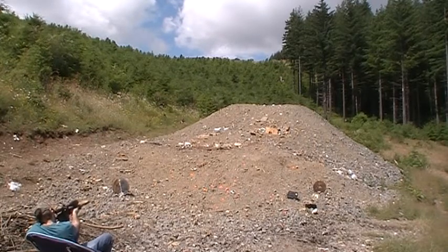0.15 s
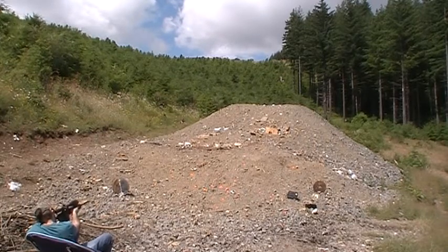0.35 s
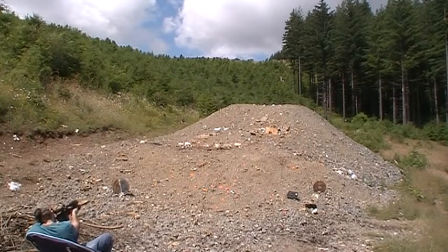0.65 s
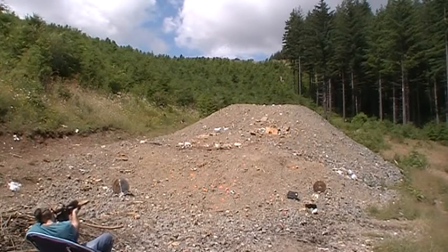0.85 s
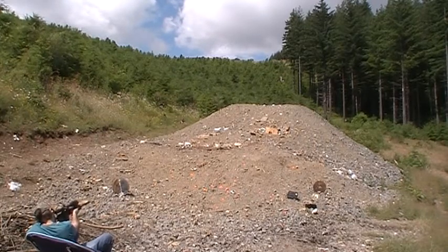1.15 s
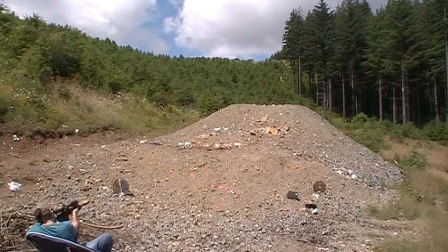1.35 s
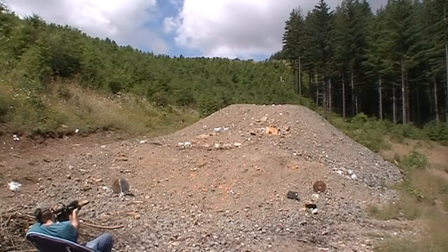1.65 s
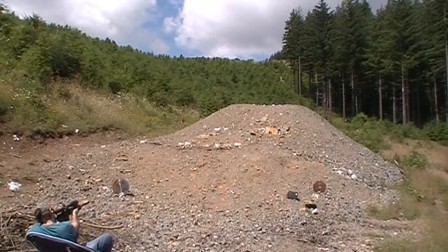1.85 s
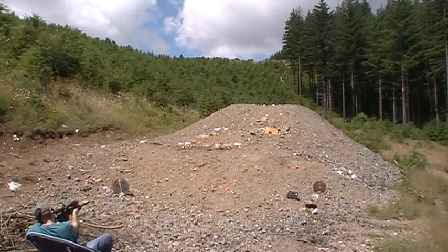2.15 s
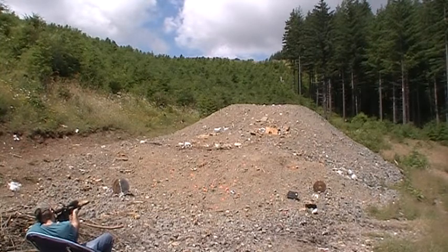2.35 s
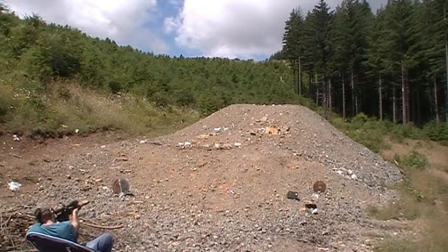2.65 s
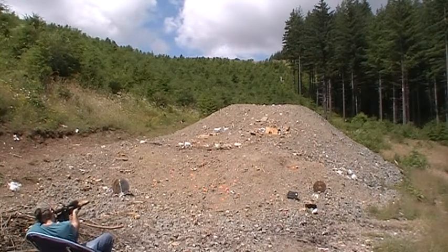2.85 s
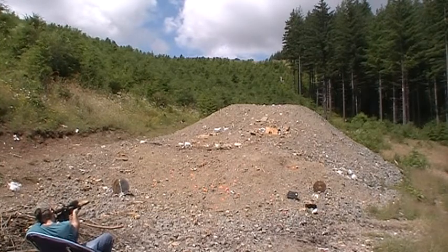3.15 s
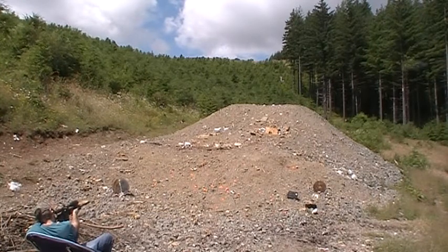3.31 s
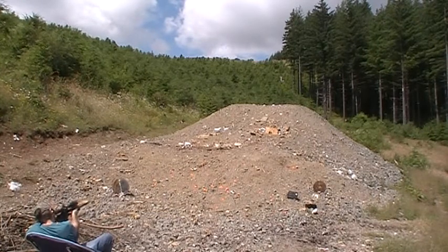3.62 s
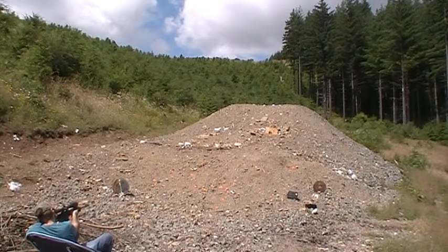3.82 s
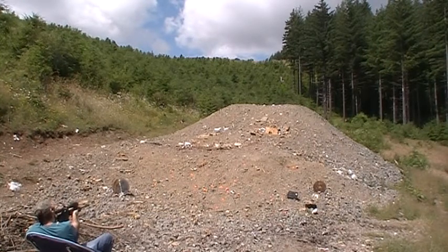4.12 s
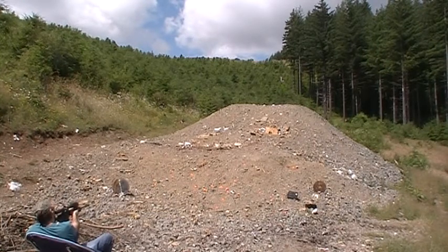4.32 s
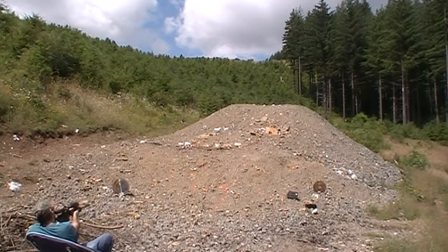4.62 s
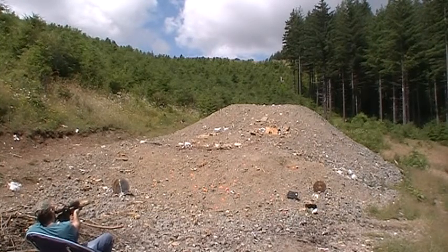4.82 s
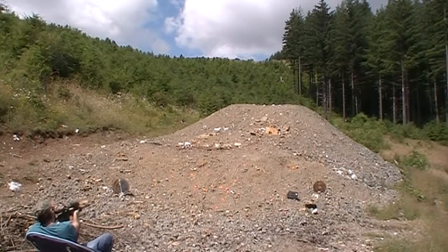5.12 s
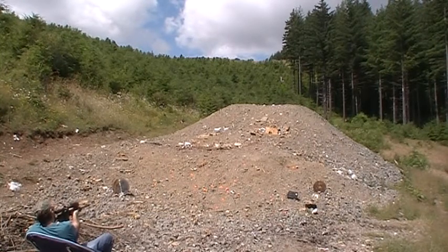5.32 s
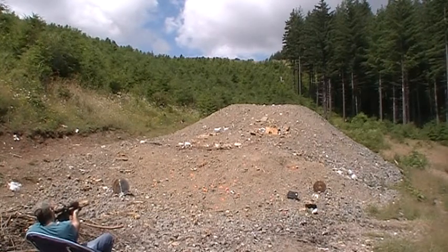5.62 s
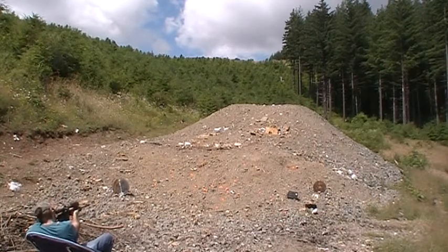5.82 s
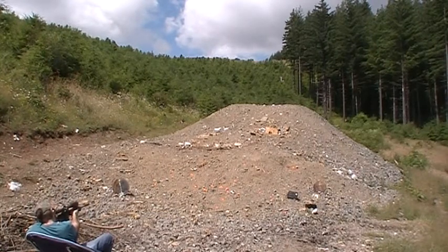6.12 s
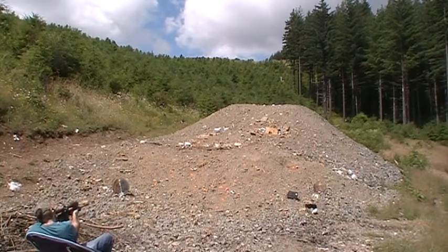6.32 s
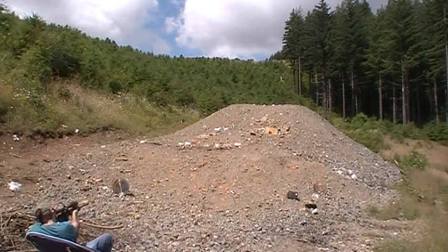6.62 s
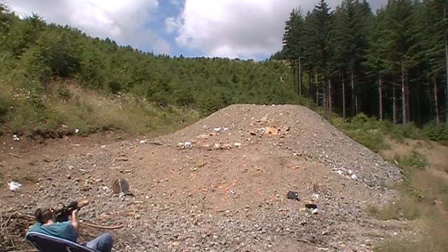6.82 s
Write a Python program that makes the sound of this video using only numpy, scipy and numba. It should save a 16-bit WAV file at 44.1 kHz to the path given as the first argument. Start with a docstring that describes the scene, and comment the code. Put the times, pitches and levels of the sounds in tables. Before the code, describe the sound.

At an open-air range among hills, a microphone behind the shooter picks up the sharp clack of a rifle being closed, then rising wind rumble. Two sharp shots overload it slightly and echo across the slopes, the second throwing up stones, with clicks and the faint tinkle of a spent case. A third shot comes about two seconds later, with a high ring from a steel target.

```python
"""A faint valley murmur, wind on the microphone, ticks of gear and a rifle action clacking shut.
The place is an outdoor gravel range, the microphone a small stereo pair behind the shooter. Three shots
overload it, slap back off near banks and roll back from wooded hills. The second throws up gravel and a
brass case bounces; the third rings a steel plate downrange. Gain control ducks after the peaks."""
import sys
import numpy as np
from scipy import signal
from scipy.fft import rfft, irfft, next_fast_len
from scipy.io import wavfile
from scipy.ndimage import uniform_filter1d, minimum_filter1d
from numba import njit

SR = 44100
rng = np.random.default_rng(int(sys.argv[2]) if len(sys.argv) > 2 else 0)


def to_wav(sig):
    """Store sig (one row per channel, or 1-D mono) as 16-bit WAV at the path in sys.argv[1].

    Samples outside -1..1 are clipped; the rate is SR.
    """
    pcm = np.clip(np.atleast_2d(sig), -1, 1) * 32767
    pcm = np.round(pcm).astype(np.int16)
    wavfile.write(sys.argv[1], SR, pcm.T)  # frames by channels


N = 306933
TIME = np.arange(N) / SR


def undb(db):
    """Decibels to amplitude."""
    return 10 ** (np.asarray(db) / 20)


def unit(x):
    """Scale to rms 1."""
    return x / np.sqrt(np.mean(x ** 2))


def power_sum(levels_db):
    """Gain of unrelated sounds heard together."""
    return np.sqrt(sum(undb(db) ** 2 for db in levels_db))


def colour(x, spectrum, edges_hz):
    """Shape x by a spectrum and split it at the edges into bands of rms 1."""
    size = next_fast_len(N)
    hz = np.arange(size // 2 + 1) * SR / size + 1
    points_hz, points_db = np.transpose(spectrum)
    shaped = rfft(x, size) * undb(np.interp(np.log(hz), np.log(points_hz), points_db))
    below = [0] + [1 / (1 + (hz / edge) ** 4) for edge in edges_hz] + [1]
    return [unit(irfft(shaped * (b - a), size)[..., :N]) for a, b in zip(below, below[1:])]


def wide(mid, side, side_db):
    """Left and right from mid and side."""
    return np.array([mid + undb(side_db) * side, mid - undb(side_db) * side])


def drift(rate_hz):
    """Smooth random wander of rms 1."""
    hold = int(SR / rate_hz)
    steps = np.repeat(rng.standard_normal(N // hold + 1), hold)
    return unit(uniform_filter1d(uniform_filter1d(steps, hold), hold)[:N])


def add(out, x, s):
    """Mix x into out from time s."""
    i = int(s * SR)
    out[..., i:i + x.shape[-1]] += x[..., :N - i]


# Open air over the valley. Each row: frequency in Hz, relative level in dB.
AIR_SPECTRUM = [(88, -33), (150, -15.5), (263, -8.5), (301, -8), (379, -4), (732, -4.5), (1020, -10),
                (1390, -10.5), (2620, -21.5), (4090, -30), (7900, -39), (15200, -52.5)]
# Far swells, perhaps echoes of distant shots. Each row: start in seconds, level in dB, t60 in seconds.
FAR_SWELLS = [(.108, -51, 1.6), (1.672, -51, 0.7), (2.666, -50, 1)]


def valley():
    """A soft distant wash; far swells start sharply in the presence band, the lows following."""
    low, presence, hiss = colour(rng.standard_normal((2, N)), AIR_SPECTRUM, [1000, 3000])
    low_db, presence_db = [-53], [-63]  # the murmur under the swells
    low_lag_s = .09
    for s, db, t60 in FAR_SWELLS:
        late = TIME - s
        fade_db = db - 60 * late / t60
        presence_db.append(fade_db + 3000 * np.minimum(late, 0))
        low_db.append(fade_db - 1.5 + 150 * np.minimum(late - low_lag_s, 0))
    wash = undb(drift(7.9)) * (power_sum(low_db) * low + power_sum(presence_db) * presence)
    return wide(*(wash + undb(-67.5 + drift(4)) * hiss), side_db=-4)


# Wind right on the microphone ports. Each row: frequency in Hz, relative level in dB.
WIND_SPECTRUM = [(12, -61.5), (20, -8), (58, -2), (106, 0), (156, -4.5), (183, -6.5), (346, -14.5),
                 (426, -44.5), (484, -13.5), (900, -43.5), (1170, -44.5), (1980, -120)]
# Gusts at the microphone. Each row: start in seconds, time at full strength in seconds, level in dB.
WIND_GUSTS = [(.05, .25, -58), (.66, 0.083, -49), (.92, .16, -35), (1.21, 0.045, -37), (1.4, .22, -36),
              (2.1, .12, -30.5), (2.3, 0.07, -41.5), (2.6, 0.082, -45.5), (2.78, 0.19, -29),
              (3.14, .17, -20), (3.465, .15, -14), (3.83, .2, -17.5), (4.1, 0.077, -24), (4.29, 0.033, -24),
              (4.57, .14, -23), (4.83, 0.098, -26), (5.0, 0.12, -38.5), (5.2, .05, -36),
              (5.399, 0.086, -44.5), (5.65, .13, -40.5), (6.0, 0.1, -46), (6.23, 0.19, -49),
              (6.59, 0.06, -40.5), (6.72, 0.066, -40.5), (6.901, 0.053, -47)]


def wind(rise_db_s=215.5, fall_db_s=203.5, calm_db=-60.5, lean_left=.14):
    """Buffeting pushes the two ports in opposite sense, so it lies mostly in the side signal."""
    rumble, flutter = colour(rng.standard_normal((2, N)), WIND_SPECTRUM, [200])
    gusts = [db - rise_db_s * np.maximum(s - TIME, 0) - fall_db_s * np.maximum(TIME - s - length, 0)
             for s, length, db in WIND_GUSTS]
    gust_db = np.maximum(np.max(gusts, axis=0), calm_db)
    buffet_db = 2.2 * drift(18)
    flutter_db = -16.5 + .67 * (gust_db + 31) + 5.4 * drift(30)  # strong gusts flutter higher
    mid, side = undb(gust_db + buffet_db) * (rumble + undb(flutter_db) * flutter)
    return wide(undb(-12) * mid + lean_left * side, side, side_db=0)


# Gear and gravel around the shooter. Each row: start in seconds, relative level in dB, centre in Hz.
GEAR_TICKS = [(.032, -50, 2800), (.047, -48, 2800), (.063, -45.5, 2800), (0.2389, -48, 3250),
              (0.514, -39.5, 3250), (0.889, -57, 4500), (1.0224, -48.5, 4170), (1.3967, -47, 3030),
              (1.5846, -29, 2600), (1.632, -49, 3230), (3.49, -22, 3450), (4.0367, 3, 2800),
              (4.0843, 0, 2800), (4.187, -1.5, 2810), (4.2271, -5.5, 3200), (4.2986, -3.5, 2580),
              (4.733, -26, 3180), (5.0301, -50, 3280), (6.6295, -46.5, 4540)]


def ticks(t60=.013):
    """Gear and falling stones each give a sharp click and a brief rattle in a broad band."""
    out = np.zeros((2, N))
    t = np.arange(900) / SR
    for s, db, hz in [*GEAR_TICKS, *falling_stones()]:
        rattle = rng.standard_normal((2, len(t)))
        rattle[0, 0] = 5  # the click
        burst = wide(*rattle, side_db=-4.5) * undb(db + 6 - 60 * t / t60)
        band = signal.butter(3, [hz / 1.8, 1.7 * hz], "band", fs=SR, output="sos")
        add(out, signal.sosfilt(band, burst), s)
    return out


# The action closing, just ahead of the microphone. Each row: start in seconds, relative level in dB.
ACTION_BLOWS = [(0.2975, -9.5), (0.2991, -2.5), (0.302, 3), (.308, -8), (.311, 7.5), (0.314, 4.5),
                (0.324, -12.5)]
# Resonances of the receiver. Each row: centre in Hz, width in Hz, relative level in dB.
RECEIVER_MODES = [(2050, 1400, 6.5), (3050, 2800, 1.5), (4900, 600, -19), (7800, 1100, -26.5),
                  (11500, 1500, -24)]


def rifle_action():
    """Short noisy blows through the broad resonances of the receiver, with a hissing tail off gravel."""
    blows = np.zeros((2, N))
    t = np.arange(SR) / SR
    fade = undb(-60 * t / .016) + undb(-24 - 60 * t / .089) + undb(-49 - 60 * t / .85)
    for s, db in ACTION_BLOWS:
        add(blows, undb(db) * fade * wide(*rng.standard_normal((2, len(t))), side_db=.82), s)
    rung = sum(undb(db - 4.5) * signal.lfilter(*signal.iirpeak(hz, hz / width, SR), blows)
               for hz, width, db in RECEIVER_MODES)
    return signal.sosfilt(signal.butter(4, 1500, "high", fs=SR, output="sos"), rung)


# The rifle, heard from behind. Each row: start in seconds, blast level in dB, scatter length in seconds,
# treble in dB, blast lag in seconds, then thump, echo, echo bass and echo treble in dB, all relative.
RIFLE_SHOTS = [(2.9336, 7.5, 0.036, 11.5, 0.0022, -11.5, 3, -15.5, 0),
               (3.59, 8, 0.051, 15, 0.00035, -5, 7.5, -4, 5.5),
               (5.7463, 5.5, 0.035, 11, 0.0022, -13, 1, -19, 5)]
# Scatter off nearby gravel and gear. Each row: time in scatter lengths, relative level in dB.
NEAR_SCATTER = [(0, -31.5), (.1, -8.5), (.8, 2), (1.05, -7), (1.6, -11.5), (2.4, -22.5), (4, -24)]
# The blast at close range. Each row: frequency in Hz, relative level in dB.
BLAST_SPECTRUM = [(35, -56.5), (60, -15), (420, -5.5), (700, -2.5), (903, -7), (1010, -2), (1340, -9),
                  (1500, -1), (1940, -3.5), (2500, -6), (2940, -5), (9590, -11.5), (15200, -27)]


def shots(spray_s=3.66):
    """The bullet's crack and the deeper muzzle blast just behind it, smeared by dense near scatter."""
    thump, boom, crack, treble = colour(rng.standard_normal((2, N)), BLAST_SPECTRUM, [600, 1500, 6000])
    treble[1] *= undb(6.5)  # treble scatters more from the sides
    thump_gain, boom_gain, crack_gain, treble_gain = np.zeros((4, N))
    for s, db, length, treble_db, lag, thump_db, *_ in RIFLE_SHOTS:
        t = np.arange(int(NEAR_SCATTER[-1][0] * length * SR)) / SR
        fall = undb(db + np.interp(t / length, *np.transpose(NEAR_SCATTER)))
        add(thump_gain, fall * undb(thump_db), s + lag)
        add(boom_gain, fall * undb(-4.5), s + lag)
        add(crack_gain, fall * undb(-1.5 - 60 * t), s)
        add(treble_gain, fall * undb(treble_db - 22), s)
    spray = undb(-5) * np.hanning(int(.02 * SR)) ** .36  # the second bullet throws up gravel
    add(crack_gain, spray * undb(-10), spray_s)
    add(treble_gain, spray, spray_s)
    blast = thump * thump_gain + boom * boom_gain + crack * crack_gain + treble * treble_gain
    return wide(*blast, side_db=-11)


def crackle(per_second=600, spread_db=3.5, share=.36):
    """Noise with lone reflections of uneven size in it."""
    size = undb(spread_db * np.clip(rng.standard_normal(N), -2, 2)) * np.sign(rng.standard_normal(N))
    lone = (rng.random(N) < per_second / SR) * size
    return np.sqrt(share) * unit(lone) + np.sqrt(1 - share) * rng.standard_normal(N)


# The blast as distant wooded slopes return it. Each row: frequency in Hz, relative level in dB.
ECHO_SPECTRUM = [(88, -73), (150, -14), (338, -8), (418, -3), (627, 3.5), (678, 2.5), (872, 0), (1280, 1.5),
                 (1850, -2.5), (3310, -5), (5690, -13), (8060, -22.5), (15200, -51.5)]
# The roll from the hills. Each row: time after any shot in seconds, relative level in dB.
HILL_ROLL = [(0, -67.5), (.08, -28), (.14, -23), (.21, -18), (.27, -21), (.36, -20.5), (.45, -23),
             (.7, -35.5), (1.2, -47), (2.2, -71)]
# A brighter, narrower wash after shot two. Each row: time in seconds, level in dB, brightness in dB.
BRIGHT_WASH = [(3.66, -63, 12), (3.76, -25, 9.5), (3.98, -12.5, 3.5), (4.08, -28.5, 13.5),
               (4.28, -36.5, 16.5), (4.39, -36, 13.5), (4.44, -27.5, 12.5), (4.5, -32, 9.5), (4.72, -36, 0),
               (5.1, -57.5, -0.5), (5.7, -57, -26)]


def hills(presence_loss_db_s=6, treble_loss_db_s=34.5, narrowing_db_s=3.5):
    """Trunks and slopes return each blast as a crackling roll that loses treble with distance."""
    thuds = np.array([crackle(), crackle()])
    bass, low, presence, _ = colour(thuds, ECHO_SPECTRUM, [450, 1800, 5500])
    # leaves scatter the treble into smooth, wide hiss
    treble = colour(rng.standard_normal((2, N)) + 1.4 * thuds, ECHO_SPECTRUM, [5500])[1]
    treble[1] *= undb(6.5)
    mids_db, sides_db = [], []
    flat = np.zeros(N)
    for s, *_, echo_db, bass_db, treble_db in RIFLE_SHOTS:
        late = np.maximum(TIME - s, 0)
        roll_db = np.where(late > 0, echo_db + np.interp(late, *np.transpose(HILL_ROLL)), -200)
        early_db = 15.5 * np.exp(-late / .083)  # the nearest trunks answer brightest
        tilt_db = np.array([flat + bass_db, flat, -4 + early_db - presence_loss_db_s * late,
                            treble_db + early_db - treble_loss_db_s * late])
        mids_db.append(roll_db + tilt_db)
        sides_db.append(mids_db[-1] - 7 - narrowing_db_s * late)
    wash_s, *columns = np.transpose([(0, -200, 0), *BRIGHT_WASH, (N / SR, -200, 0)])
    wash_db, bright_db = (np.interp(TIME, wash_s, column) for column in columns)
    mids_db.append(wash_db + np.array([flat - 13.5, flat, bright_db, -35 + 2.23 * bright_db]))
    sides_db.append(mids_db[-1] - 12.5)
    bands = np.array([bass, low, presence, treble])
    mid = (power_sum(mids_db) * bands[:, 0]).sum(axis=0)
    side = (power_sum(sides_db) * bands[:, 1]).sum(axis=0)
    flicker_db, pan_db = drift(25), np.array([[-.75], [.75]])
    return wide(mid, side, side_db=0) * undb(flicker_db + pan_db)


# Single echoes off near banks and trunks. Each row: arrival in seconds, level in dB, pulse pitch in Hz.
BANK_SLAPS = [(2.9902, 13, 1600), (2.9995, 15, 2100), (3.099, 0, 900), (3.116, 5, 1300), (3.139, 2, 1000),
              (3.156, 4, 1300), (3.177, 2, 900), (3.229, -1, 1500), (3.727, 7, 700), (3.753, 9, 800),
              (3.769, 8, 900), (3.887, 7, 1100), (3.926, 7, 900), (5.8023, 14, 1600), (5.8118, 17, 2100)]


def slaps():
    """Each flat face sends the blast back as one short damped cycle."""
    out = np.zeros(N)
    for s, db, hz in BANK_SLAPS:
        cycles = np.arange(int(.005 * SR)) / SR * hz
        add(out, undb(db) * np.exp(-cycles / .6) * np.sin(2 * np.pi * cycles), s)
    return out


def falling_stones(count=60, span_s=(3.95, 4.42), range_hz=(1600, 3600)):
    """Stones thrown up by the second bullet patter down at random, as rows for ticks()."""
    when, size, pitch = rng.random((count, 3)).T
    levels_db = -16 - 3 * np.log(size)
    return zip(np.interp(when, [0, 1], span_s), levels_db, np.interp(pitch, [0, 1], range_hz))


def ring(modes, strike_db, strike_s, waver_db):
    """Struck metal: its modes fall fast at first, then ring on, wavering as it swings."""
    t = np.arange(int(1.15 * SR)) / SR
    tones = 0
    for hz, db, t60 in modes:
        phase, rate, swing = rng.random(3)
        waver = waver_db * (np.cos(2 * np.pi * (3 + 7 * rate) * t + swing) - 1)
        tones = tones + undb(db - 60 * t / t60 + waver) * np.sin(2 * np.pi * (hz * t + phase))
    return tones * np.minimum(t / .001, 1) * undb(strike_db * np.exp(-t / strike_s))


# Modes of the brass case. Each row: frequency in Hz, relative level in dB, t60 in seconds.
CASE_MODES = [(10700, -4.5, 0.39), (10700, -5, 0.2), (10700, -20, .15), (15000, -16, 0.28),
              (14950, -23.5, .25), (15080, -8, 0.29)]
# The case landing on gravel near the shooter. Each row: start in seconds, relative level in dB.
CASE_BOUNCES = [(4.1994, -27), (4.2582, -45), (4.5286, -28), (4.5825, -38), (4.6565, -38.5)]


def brass_case():
    """The spent case tinkles at each bounce."""
    out = np.zeros((2, N))
    for s, db in CASE_BOUNCES:
        mid, side = (ring(CASE_MODES, strike_db=3.6, strike_s=.022, waver_db=3.5) for _ in range(2))
        add(out, undb(db + 1.5) * wide(mid, side, side_db=-9), s)
    return out


# Modes of the steel plate downrange. Each row: frequency in Hz, relative level in dB, t60 in seconds.
PLATE_MODES = [(1017, -37, 1.5), (2428, -41, 1.5), (2857, -42, 1.5), (3068, -30, 1.5), (3585, -38, 1.5),
               (3709, -32, 1.46), (4414, -38, 1.5), (4527, -39, 1.5), (4587, -28, 1.5), (4689, -41, 1.5),
               (4893, -32, 1.42), (4916, -31, 1.19), (5760, -33, 1.1), (5820, -36, 1.5), (6110, -42, 1.5),
               (6210, -43, 1.5), (6815, -45, 1.5), (7020, -37, 1.11), (7251, -35, 0.86), (7370, -51, 1.5),
               (7607, -47, 1.5), (7951, -40, 1.21), (8048, -35, 0.89), (8312, -31, 0.71), (8484, -37, 0.77),
               (9119, -42, 0.88), (9803, -50, 1.08)]


def steel_plate(hit_s=5.822):
    """The third bullet strikes with a bright splash and leaves the plate ringing."""
    out = np.zeros((2, N))
    t = np.arange(3000) / SR
    splash = rng.standard_normal((2, len(t))) * undb(9 - 60 * t / .089)
    add(out, signal.lfilter(*signal.iirpeak(6000, .7, SR), splash), hit_s)
    mid, side = (ring(PLATE_MODES, strike_db=23.1, strike_s=.14, waver_db=5) for _ in range(2))
    add(out, undb(9) * wide(mid, side, side_db=-15), hit_s)
    return out


def scene():
    """Everything that reaches the microphone behind the shooter."""
    gunfire = shots() + slaps() + hills()
    return gunfire + steel_plate() + brass_case() + rifle_action() + ticks() + valley() + wind()


@njit
def follow(x, attack_s, release_s):
    """Envelope that rises fast and falls slowly."""
    level, out = 0., np.empty(len(x))
    for i in range(len(x)):
        level += (x[i] - level) / (SR * (attack_s if x[i] > level else release_s))
        out[i] = level
    return out


def record(dry, threshold_db=-15, attack_s=.0054, recovery_s=.17, slew_s=.003, top_hz=15400):
    """Small capsules colour the sound, gain control ducks after loud peaks, the rest clips softly."""
    heard = dry - .45 * signal.lfilter(*signal.iirpeak(6300, 4, SR), dry)
    heard = heard + .9 * signal.lfilter(*signal.iirpeak(8600, 3, SR), heard)
    heard = signal.sosfilt(signal.butter(1, [45, 11000], "band", fs=SR, output="sos"), heard)
    sensed = signal.lfilter(*signal.butter(2, 400, "high", fs=SR), heard)  # ignores wind rumble
    loudness = follow(np.abs(sensed).max(axis=0), attack_s, recovery_s)
    gain = np.maximum(loudness / undb(threshold_db), 1) ** -.7
    slew = int(slew_s * SR)
    gain = uniform_filter1d(minimum_filter1d(gain, 2 * slew), slew)  # drops just ahead of a peak
    clipped = .89 * np.tanh(1.175 * gain * heard) / np.tanh(1.6)
    return signal.sosfilt(signal.ellip(12, .2, 50, top_hz, fs=SR, output="sos"), clipped)


dry = scene()
out = record(dry)
to_wav(out)
```